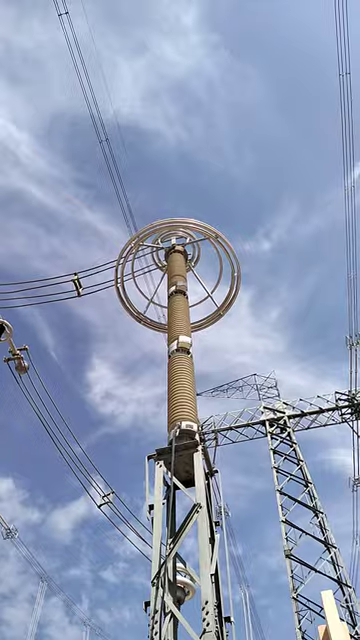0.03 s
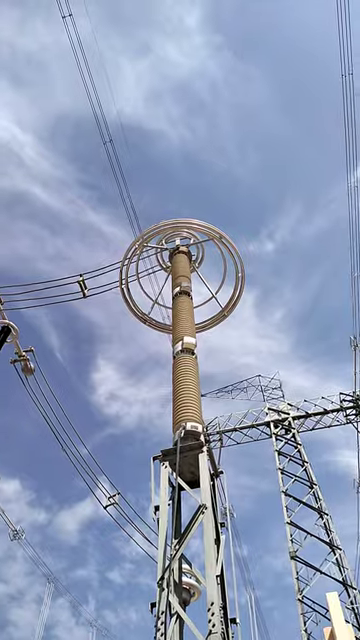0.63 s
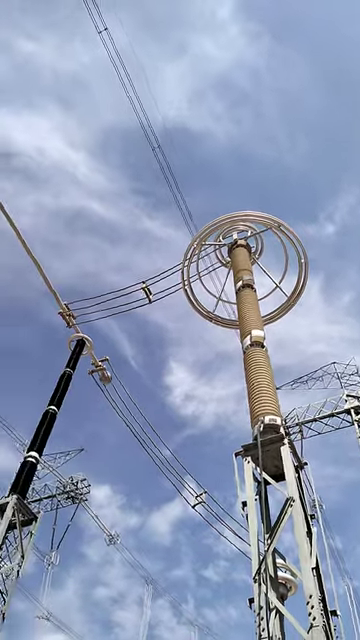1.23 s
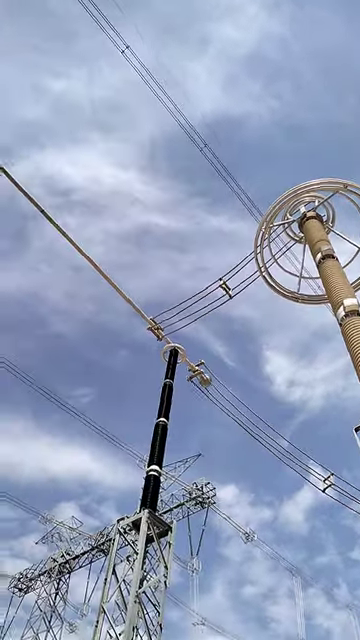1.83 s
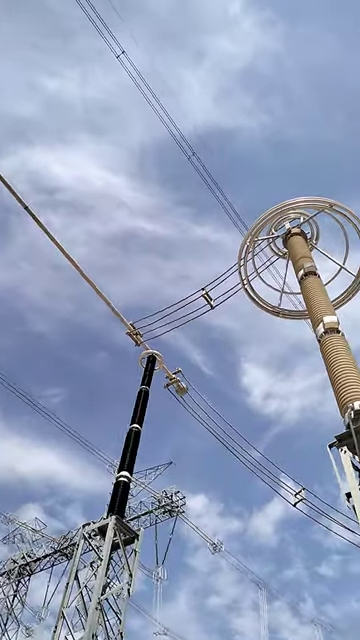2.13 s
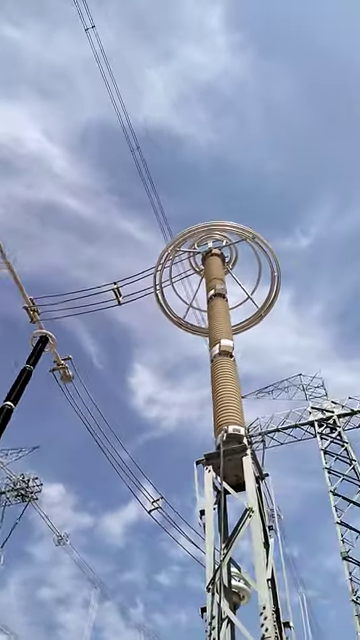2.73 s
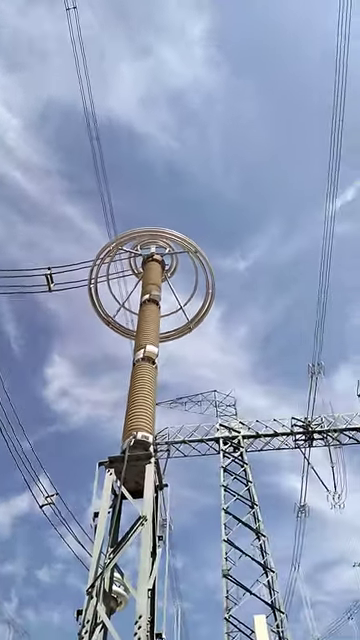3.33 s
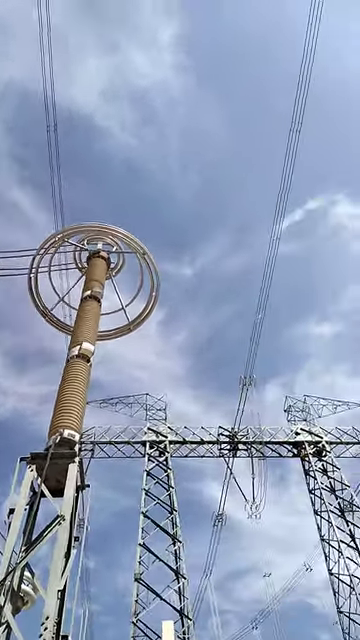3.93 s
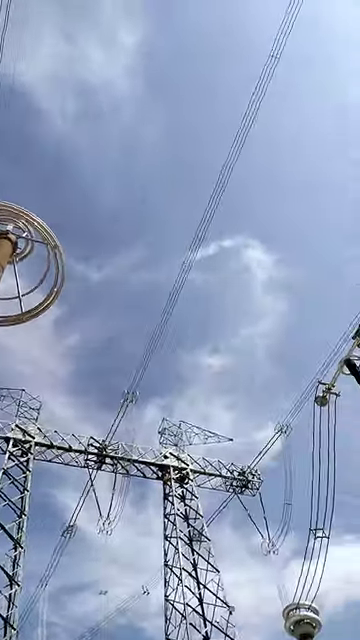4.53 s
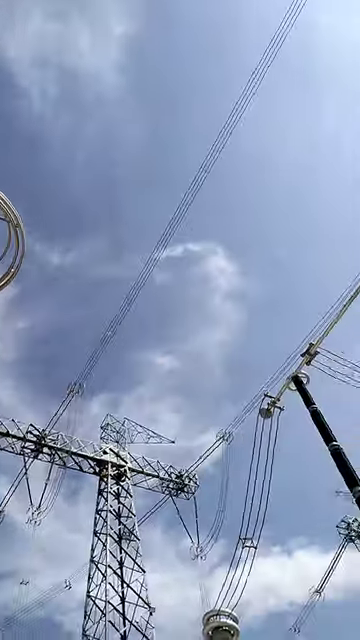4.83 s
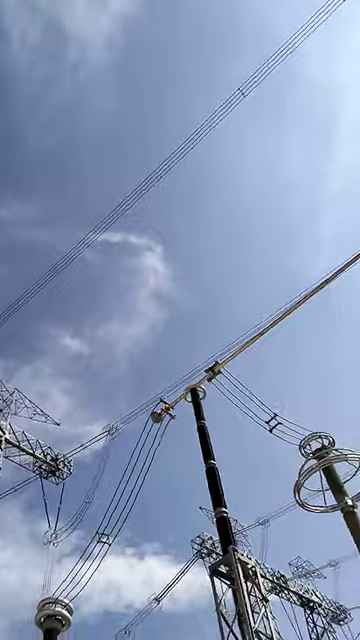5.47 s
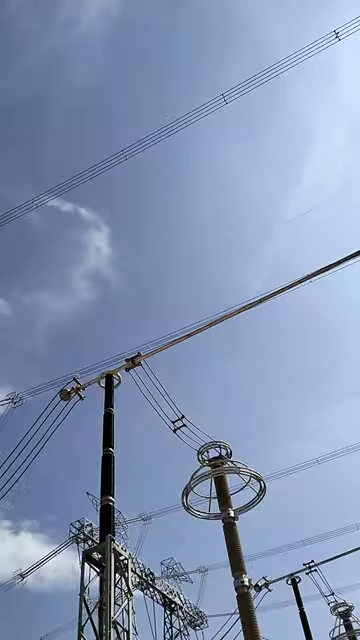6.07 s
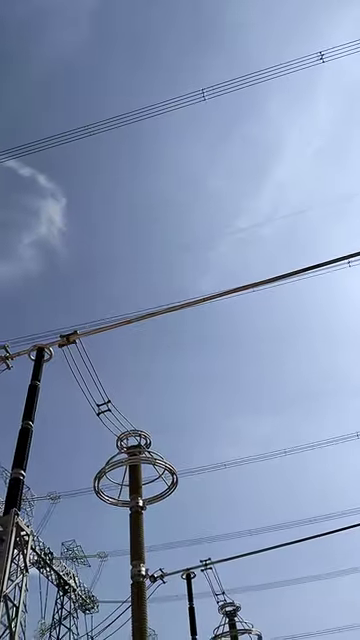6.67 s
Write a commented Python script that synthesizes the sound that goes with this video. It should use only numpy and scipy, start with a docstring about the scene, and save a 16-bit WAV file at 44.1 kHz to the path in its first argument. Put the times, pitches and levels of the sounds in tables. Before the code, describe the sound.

Wind buffets a stereo microphone in an open electrical yard, making an uneven low rumble with brief thumps that jump between the sides. Behind it, transformers drone at a constant low pitch, coils whine faintly and the power lines hiss. After a quick fade-in the wind is light, gives one strong gust, settles, then returns in repeated stronger gusts through the last few seconds.

```python
"""A low hum fades in under gusty wind: a high-voltage switchyard, heard through two microphone ports.
Transformer cores hum at twice the mains rate and its harmonics, reactor coils whine, and corona
discharge hisses on the conductors overhead. Turbulence rumbles in each port as the gusts pass,
and the hardest eddies strike as short thumps."""
import sys
import numpy as np
from scipy import signal
from scipy.fft import irfft
from scipy.io import wavfile
from scipy.ndimage import uniform_filter1d

SR = 44100
rng = np.random.default_rng(int(sys.argv[2]) if len(sys.argv) > 2 else 0)


def output_pcm(signal):
    """Save a mono or channel-first signal as 16-bit PCM at the path in sys.argv[1].

    Samples are clipped to [-1, 1] before scaling.
    """
    pcm = np.clip(np.atleast_2d(signal).T, -1, 1) * 32767
    wavfile.write(sys.argv[1], SR, np.round(pcm).astype(np.int16))


N = 295470
T = np.arange(N) / SR
MAINS_HZ = 49.98

# Balance of the yard between the ports. Each row: frequency in Hz, left minus right in dB.
PORT_BALANCE = [(600, 0.5), (1000, -3), (1700, -4.5), (2600, 0), (3500, -3.5), (6200, -1.5), (8500, -1),
                (11000, -5.5), (13000, -8)]
# The microphone turns toward the plant. Each row: time in seconds, lead of the right port in ms.
RIGHT_LEAD = [(0, 0.36), (4.2, 0.33), (5.2, 0.39), (5.8, 0.21), (6.3, 0.14), (6.7, 0.068)]
# Strength of the gusts. Each row: time in seconds, left level in dB, right level in dB.
GUSTS = [(.35, -26, -22.5), (1.05, -21, -16.5), (1.25, -15, -14.7), (1.75, -19.5, -18), (1.87, -6.5, -4),
         (2.1, -15, -13), (2.66, -21, -17.5), (3.81, -22, -17), (3.95, -13.5, -4), (4.27, -8, -6.5),
         (4.5, -14.5, -11), (4.76, -12, -4.5), (5.06, -9.5, -9.5), (5.2, -9.5, -19), (5.31, -9, -10),
         (5.5, -21.5, -16), (5.73, -15, -21), (5.91, -8.5, -6.5), (6.22, -14.5, -6), (6.38, -7, -7.5),
         (6.7, -17, -14.5)]
# The hardest eddies. Each row: time in seconds, relative peak in dB, left minus right in dB.
HARD_EDDIES = [(0.6, -11, -23), (1.18, -13, -20), (1.818, -16.5, -21), (1.922, -12.5, 19), (1.991, -11, 12),
               (2.224, -11.5, -10), (2.271, -15.5, -4), (2.961, -14.5, -20), (4.235, -13, 18),
               (4.259, -11.5, -19), (4.353, -11.5, 24), (4.761, -6.5, 22), (4.906, -11.5, -18),
               (4.946, -12.5, -17), (5.006, -10.5, -22), (5.051, -10, 15), (5.075, -9, -8), (5.151, -5, 21),
               (5.559, -14.5, -21), (5.952, -12, 5), (6.059, -9.5, -9), (6.086, -7.5, -23),
               (6.335, -7, 9.5), (6.399, -9, -13), (6.438, -10.5, -13), (6.481, -11, -16)]


def from_db(db):
    """Amplitude grows tenfold for every 20 dB."""
    return 10 ** (np.asarray(db) / 20)


def unit_rms(x):
    """Normalisation to a mean power of 1."""
    return x / np.sqrt(np.mean(x ** 2) + 1e-20)


def in_time(rows):
    """Linear interpolation of each column of a time curve, at every sample."""
    times, *columns = np.transpose(rows)
    return [np.interp(T, times, column) for column in columns]


def at_hz(points, hz):
    """Interpolation of a spectrum on a log-frequency axis."""
    frequencies, values = np.transpose(points)
    return np.interp(np.log(hz), np.log(frequencies), values)


def pan(side_db):
    """Constant-power panning: left and right gains side_db apart."""
    return unit_rms(from_db([[side_db / 2], [-side_db / 2]]))


def drift(rate):
    """Low-passed noise of rms 1 that changes about rate times a second."""
    pole = np.exp(-80 * np.pi * rate / SR)
    slow = signal.lfilter([1], [1, -2 * pole, pole * pole], rng.standard_normal(N // 40 + 2002))[2000:]
    return np.interp(np.arange(N) / 40, np.arange(len(slow)), unit_rms(slow))


def band(x, low, high):
    """Band-pass filtering between two edges in Hz."""
    return signal.sosfilt(signal.butter(2, [low, high], "band", fs=SR, output="sos"), x)


def two_ports(x):
    """Path difference: a far sound reaches the right port just before the left."""
    lead_ms, = in_time(RIGHT_LEAD)
    return np.array([x, np.interp(T + lead_ms / 1000, T, x)])


def noise_field(spectrum, flicker_db):
    """Direct sound is coherent between the ports, scattered sound is not; third octaves mix the two."""
    # Sound straight from the plant. Each row: frequency in Hz, share of the power from 0 to 1.
    direct_share = [(100, 1), (400, 0.62), (700, 0.12), (1000, 0.4), (1450, 0.63), (1900, 0.5), (2700, 0.3),
                    (3600, 0.08), (6000, 0)]
    edges = 40 * 2 ** (np.arange(27) / 3)
    direct = [two_ports(white) for white in rng.standard_normal((2, N))]
    out, scattered = 0, rng.standard_normal((2, 2, N))
    for k, (low, high) in enumerate(zip(edges, edges[1:])):
        hz = np.sqrt(low * high)
        share = np.clip(at_hz(direct_share, hz), 0, 1)
        noise = np.sqrt(share) * direct[k % 2] + np.sqrt(1 - share) * scattered[k % 2]
        gain = from_db(at_hz(spectrum, hz) + flicker_db * drift(7.9)) * pan(at_hz(PORT_BALANCE, hz))
        out = out + gain * band(noise, low, high)
    return unit_rms(out)


def yard_air():
    """Ambient noise: the whole yard merges into a broad, flickering rush."""
    # Each row: frequency in Hz, relative spectral density in dB.
    air_spectrum = [(40, 5.5), (130, -26), (250, -1), (420, -1), (620, -1), (1000, -4.5), (1450, -1.5),
                    (2000, -6.5), (2800, -11.5), (5000, -21)]
    return noise_field(air_spectrum, flicker_db=1.5)


def corona(pulsing, sputter_db):
    """Corona discharge: countless tiny sparks merge into a hiss that lifts at each voltage crest."""
    # Each row: frequency in Hz, relative spectral density in dB.
    hiss_spectrum = [(900, -36.5), (2500, -9), (3500, 2.5), (5200, 0), (7500, -9), (9000, -12.5),
                     (11000, -7), (12500, -7.5), (14500, -35)]
    crest_phase = 4 * np.pi * MAINS_HZ * T
    crests = 1 + pulsing * np.cos(crest_phase) + .5 * pulsing * np.cos(2 * crest_phase)
    return noise_field(hiss_spectrum, flicker_db=1.0) * crests * from_db(sputter_db * drift(60))


def sidebands(scatter_db):
    """Modulation of the coil currents by the mains gives combs of faint lines, one mains rate apart."""
    # Each row: frequency in Hz, relative level per line in dB.
    comb_envelope = [(550, -60), (1000, -65.5), (1450, -62), (2000, -64), (2700, -71.5), (3600, -75)]
    spectrum = np.zeros((2, N // 2 + 1), complex)
    for offset_hz in (0, 5, 10, 18, 23.5, 36.5, 42):
        hz = offset_hz + MAINS_HZ * np.arange(11, 70)
        line_db = at_hz(comb_envelope, hz) + scatter_db * rng.standard_normal((2, len(hz)))
        line_db += at_hz(PORT_BALANCE, hz) * np.array([[.5], [-.5]])
        bins = np.round(hz * N / SR).astype(int)
        spectrum[:, bins] = from_db(line_db) * np.exp(2j * np.pi * rng.random(line_db.shape))
    return irfft(spectrum, N) * N / np.sqrt(2)


def coil_whine(level_db, fading, neighbour_db):
    """Interference: thin tones straight from the coils swell and fade against drifting reflections."""
    # Each row: frequency in Hz, relative level in dB, left minus right in dB.
    coil_tones = [(618, -53, 0), (800, -54, 0), (900, -53, -3), (987, -54, -5), (1200, -53, -6),
                  (1355, -59, -7), (1387, -55, -8), (1455, -53.5, -1), (1523.5, -57, -6), (1655, -59, -5),
                  (1755, -60, -2), (1823.3, -55, -8), (1855.5, -59, 0), (2023.3, -56, -4)]
    out = 0
    lead_ms, = in_time(RIGHT_LEAD)
    for hz, line_db, side_db in coil_tones:
        direct = np.exp(2j * np.pi * hz * np.outer([0, 1], lead_ms) / 1000)
        paths = direct + fading * np.array([drift(1.0) + 1j * drift(0.57) for port in range(2)])
        tone = (paths * np.exp(2j * np.pi * (hz * T + rng.random()))).real
        # the throb adds a weaker tone one hum pitch below and above
        throb = 1 + 2 * from_db(neighbour_db) * np.cos(2 * np.pi * (2 * MAINS_HZ * T + rng.random()))
        out = out + from_db(line_db + level_db) * pan(side_db) * unit_rms(tone) * throb
    return out


def transformers(waver_db, waver_radians):
    """Magnetostriction flexes iron cores twice per mains cycle; moving air makes each harmonic waver."""
    # Each row: multiple of the mains rate, level in dB, left minus right in dB,
    # swell in dB per second as the microphone moves.
    harmonics = [(2, -28, 1, 0.5), (4, -31.5, 0, 0.5), (6, -25, 0, 0), (8, -33.5, -1.5, 0),
                 (10, -46, -4, 0), (12, -52, -7, 0)]
    out = 0
    for multiple, level_db, side_db, swell in harmonics:
        phase = 2 * np.pi * (round(multiple) * MAINS_HZ * T + rng.random()) + waver_radians * drift(0.76)
        gain = from_db(level_db + swell * T + waver_db * drift(1.74)) * pan(side_db)
        out = out + gain * two_ports(np.sqrt(2) * np.sin(phase))
    return out


def swells(rows, rise_s, fall_s):
    """Short bell-shaped swells add in power on each port."""
    power = np.zeros((2, N))
    for peak_s, level_db, side_db in rows:
        shape = np.exp(-((T - peak_s) / np.where(T < peak_s, rise_s, fall_s)) ** 2)
        power += (from_db(level_db) * pan(side_db)) ** 2 * shape
    return power


def wind_strength():
    """Incoherent addition: gusts, puffs and the wakes of hard eddies sum to a level in dB per port."""
    # Puffs between the gusts. Each row: time in seconds, level in dB, left minus right in dB.
    soft_puffs = [(.51, -11, -5), (1.01, -12, -13), (1.21, -15, -4), (1.48, -12, -2.5), (2.25, -9, -23),
                  (2.84, -16, -8), (2.99, -13.5, -2), (3.14, -12, -19), (3.37, -13, -12), (3.59, -10.5, -3)]
    gusts = from_db(in_time(GUSTS)) ** 2
    puffs = swells(soft_puffs, rise_s=0.028, fall_s=0.036)
    wakes = from_db(-2) ** 2 * swells(HARD_EDDIES, rise_s=0.011, fall_s=0.029)
    return 10 * np.log10(gusts + puffs + wakes)


def port_wind(level_db, body_hz, edge_ratio, flutter_db, lumps_db):
    """Turbulence on one port: harder flow is louder and breaks into smaller, higher-pitched eddies."""
    # How sharply the rumble brightens as the wind grows. Each row: time in seconds, octaves per dB.
    gust_brightness = [(1.9, 0.0465), (4.0, -0.0043), (4.25, 0.033), (4.55, .02), (4.85, 0.027),
                       (5.05, 0.12), (5.2, 0.074), (5.85, 0.0754), (6.1, 0.04), (6.4, 0.0644)]
    octaves_per_db, = in_time(gust_brightness)
    # the spectrum's upper edge rises once the wind exceeds -19.5 dB
    edge_hz = 221 * 2 ** (octaves_per_db * np.maximum(level_db + 19.5, 0))
    push = from_db(flutter_db * drift(44.6))
    edge = edge_hz * edge_ratio * push ** 0.82
    # slow air rumbles deeper
    body = body_hz * np.sqrt(edge_hz / np.mean(edge_hz)) * 2 ** (0.053 * (level_db + 10))
    band_edges = 20 * 2 ** (np.arange(14) / 2)
    out, power, white = 0, 0, rng.standard_normal((2, N))
    for k, (low, high) in enumerate(zip(band_edges, band_edges[1:])):
        hz = np.sqrt(low * high)
        port_response = 1 / np.sqrt((1 + (44 / hz) ** 8.8) * (1 + (hz / body) ** 2.93))
        gain = port_response * np.sqrt((high - low) / (1 + (hz / edge) ** 7))
        eddies = unit_rms(band(band(white[k % 2], low, high), low / 2, high * 2))
        out = out + gain * eddies * from_db(lumps_db * drift(14.6))
        power = power + gain ** 2
    # the gust sets the strength over a tenth of a second; quicker lumps are chance
    flow = push * out / np.sqrt(power)
    return from_db(level_db) * flow / np.sqrt(uniform_filter1d(flow ** 2, size=4410) + 1e-6)


def stray_eddies(count, relative_db, spread_db, side_db):
    """Intermittency: weaker eddies strike at random, scaled by the gusts; rows as in HARD_EDDIES."""
    gust_db, rows = in_time(GUSTS), []
    for when, which, chance in rng.random((count, 3)):
        at, port = int((.05 + .9 * when) * N), int(which < .5)
        peak_db = gust_db[port][at] + relative_db + spread_db * (2 * chance - 1)
        rows.append((at / SR, peak_db, side_db * (-1) ** port))
    return rows


def buffets(level_db, top_hz, octaves_per_db, rebound_cycles, rebound_db, thump_db, thump_hz):
    """Pressure transients: an eddy hits a port with a spike and three weaker swings, quicker if harder."""
    out, swing = np.zeros((2, N)), np.arange(4)
    strays = stray_eddies(count=30, relative_db=-8, spread_db=2, side_db=9)
    for hit_s, peak_db, side_db in HARD_EDDIES + strays:
        hz = top_hz * 2 ** (octaves_per_db * (peak_db + 11.5))
        gaps_s = rebound_cycles / hz * rng.uniform(.5, 1.5, len(swing)) * (swing > 0)
        heights = rng.choice([-1, 1]) * (-1) ** swing * from_db(rebound_db * swing)
        spikes = np.zeros(SR // 10)
        spikes[(np.cumsum(gaps_s) * SR).astype(int)] = heights
        rounded = signal.sosfilt(signal.bessel(6, hz, fs=SR, norm="mag", output="sos"), spikes)
        # the bulk of the eddy follows as a dull thump
        burst = band(rounded, 73, 2 * hz) + from_db(thump_db) * band(rounded, 58, thump_hz)
        start = int((hit_s - 1 / hz) * SR)   # the spike builds up for about a cycle
        gain = from_db(peak_db + level_db) * pan(side_db)
        out[:, start:start + len(burst)] += gain * burst / np.abs(burst).max()
    return out


def scene():
    """Superposition: the steady yard, with the wind on top."""
    # The yard's rush and hiss dip briefly under the strongest gusts.
    # Each row: time in seconds, relative midrange level in dB, relative treble level in dB.
    yard_level = [(.5, -43, -48.5), (1.1, -42.5, -47.3), (1.8, -42.5, -47), (2.0, -45, -49.5),
                  (2.7, -42, -47.5), (3.6, -42, -47), (4.3, -44, -49.5), (5.15, -46, -49), (5.6, -44, -49),
                  (6.0, -45, -50.5), (6.7, -44.5, -50)]
    middle_db, treble_db = in_time(yard_level)
    air = from_db(middle_db + 9.0) * yard_air()
    coils = coil_whine(level_db=3.5, fading=0.38, neighbour_db=-7) + sidebands(scatter_db=3.5)
    coils *= from_db(middle_db - np.mean(middle_db))
    hiss = from_db(treble_db + 6.5) * corona(pulsing=.06, sputter_db=0.72)
    left_db, right_db = wind_strength()
    left = port_wind(left_db, body_hz=123, edge_ratio=1.0, flutter_db=2.5, lumps_db=2.3)
    right = port_wind(right_db, body_hz=106.5, edge_ratio=0.95, flutter_db=2.5, lumps_db=2.4)
    hits = buffets(level_db=7.5, top_hz=402, octaves_per_db=.045, rebound_cycles=1.064,
                   rebound_db=-3.5, thump_db=3.5, thump_hz=171)
    hum = transformers(waver_db=0.83, waver_radians=0.24)
    return air + coils + hiss + hum + np.array([left, right]) + hits


def record(dry):
    """The recorder fades in, soft saturation rounds the peaks, and a low-pass cuts above 14220 Hz."""
    # Each row: time in seconds, gain in dB.
    fade_in = [(0, -102), (.11, -71), (.135, -21), (.25, -13.5), (.35, -7.5), (.48, -5.5)]
    gain_db, = in_time(fade_in)
    faded = dry * from_db(gain_db)
    rounded = faded / (1 + (faded / .95) ** 4) ** .25
    return signal.sosfilt(signal.ellip(12, .1, 90, 14220, fs=SR, output="sos"), rounded)


dry = scene()
out = record(dry)
output_pcm(out)
```